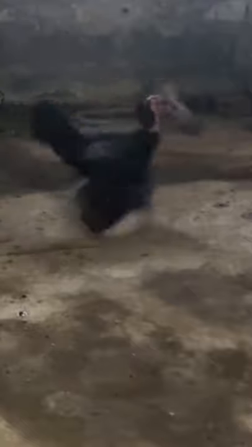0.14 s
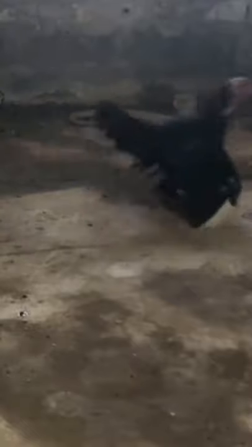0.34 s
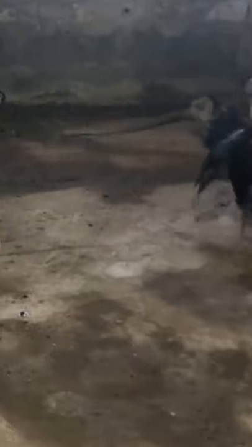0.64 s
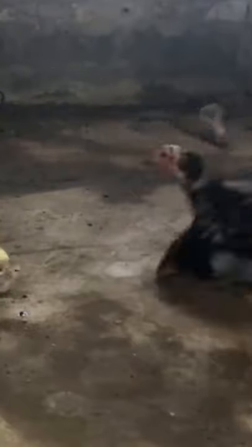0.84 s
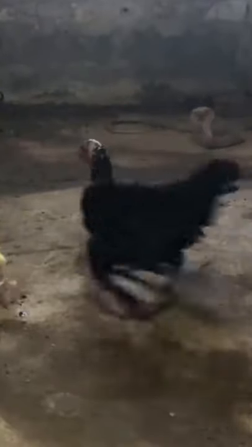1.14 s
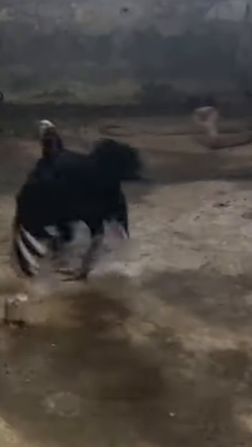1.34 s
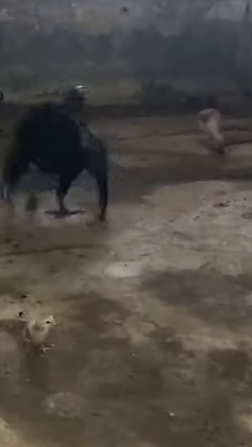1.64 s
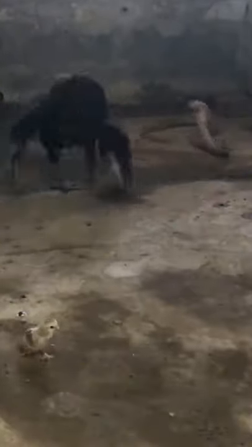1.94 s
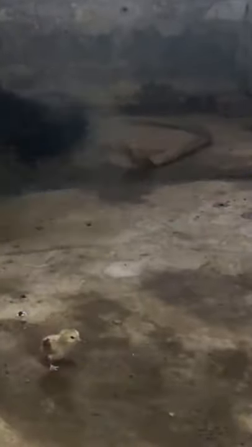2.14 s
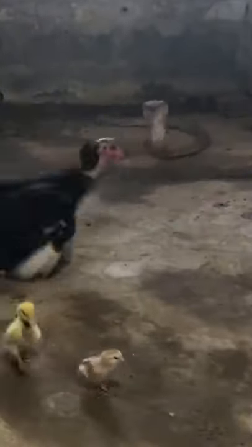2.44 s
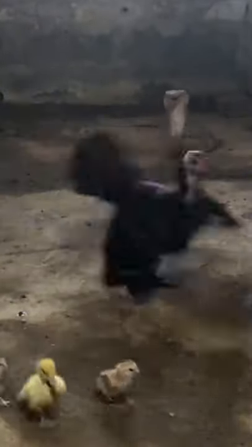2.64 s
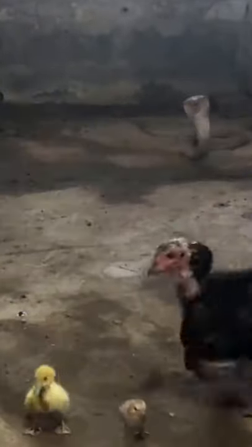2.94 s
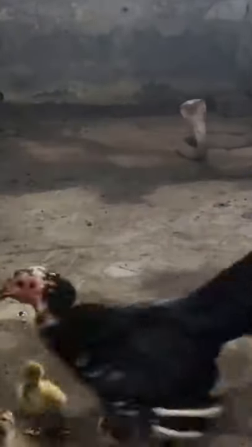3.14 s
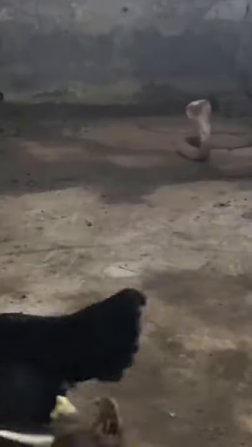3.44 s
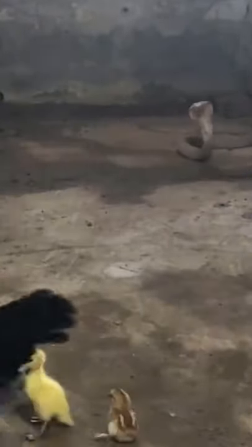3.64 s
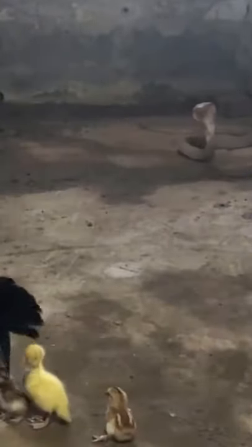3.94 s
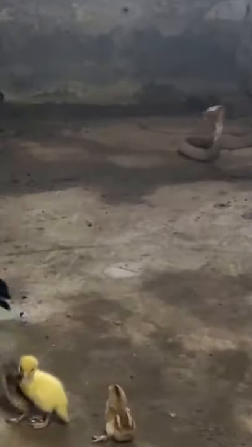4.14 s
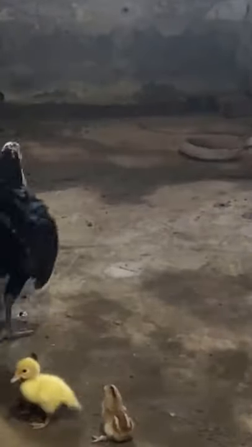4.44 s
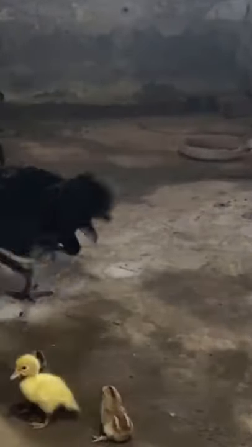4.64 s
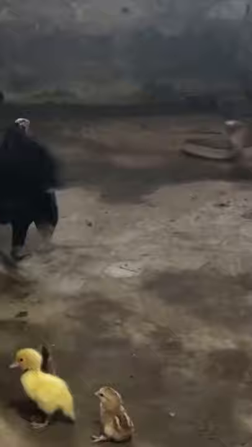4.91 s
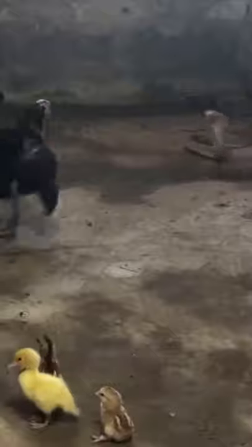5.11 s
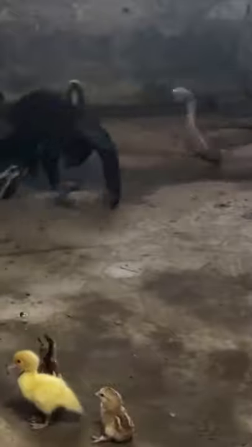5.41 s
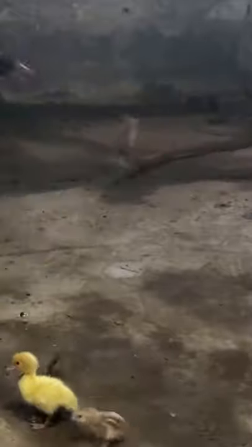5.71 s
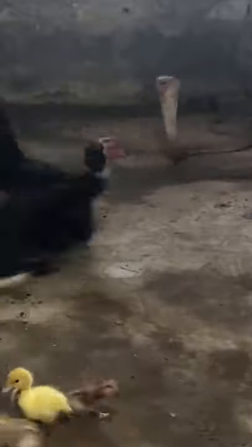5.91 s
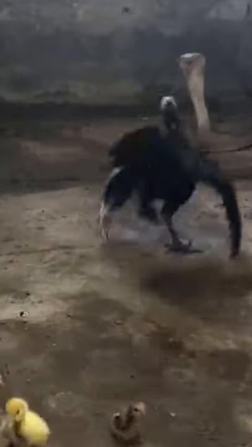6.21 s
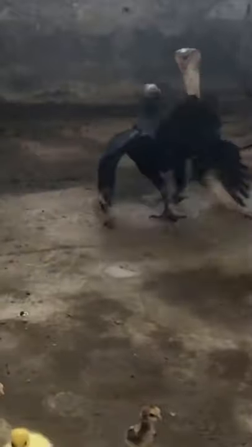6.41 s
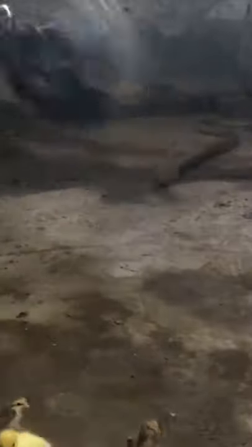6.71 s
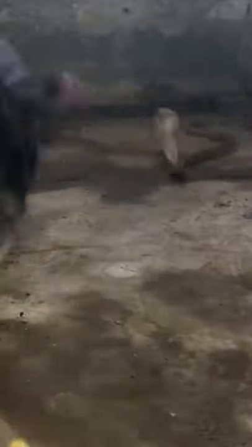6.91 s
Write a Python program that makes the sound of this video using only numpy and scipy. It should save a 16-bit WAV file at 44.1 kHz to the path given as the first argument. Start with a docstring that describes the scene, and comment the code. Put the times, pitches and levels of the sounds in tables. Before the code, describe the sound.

Close, rough hen cackling opens at once and grows dense through the middle, strained and nasal with a scratchy edge. Clear, piercing chick peeps continue underneath, with a few quavering shrieks around the fifth second. Soft to sharp air-like hisses come between calls. After one long squawk that cracks, the hen drops to sparse low clucks while the peeping goes on. Concrete walls give a short, dull ring over a faint low rumble.

```python
"""In a walled concrete yard a hen cackles in agitated bursts at a cobra and ends on three low, hoarse clucks.
Her voice is a buzzing syrinx filtered by the throat, with strained overtones and a noisy rasp above it.
Her chicks peep all the while: near-pure tones that arch, then drop into a fast downward slide; some shriek.
A breathy hiss, probably the snake, is filtered noise that swells and fades.
A steady low noise lies beneath, and decaying noise tails give the walls' short ring."""
import sys
import numpy as np
from scipy import signal
from scipy.fft import rfft, irfft
from scipy.io import wavfile
from scipy.ndimage import uniform_filter1d

SR = 44100
rng = np.random.default_rng(int(sys.argv[2]) if len(sys.argv) > 2 else 0)


def transcribe(signal):
    """Save signal, clipped to [-1, 1], as a 16-bit WAV file at the path in sys.argv[1]."""
    frames = np.atleast_2d(signal).T
    limited = np.clip(frames, -1, 1)
    pcm = np.round(limited * 32767).astype(np.int16)
    wavfile.write(sys.argv[1], SR, pcm)


N = 311339
TIME = np.arange(N) / SR   # s

# the hen's syllables, each one push of air; the levels are at full effort, ahead of each band's own gain:
# (start [s], swell [s], hold [s], pitch at full effort [Hz], roughness at full effort [0-1],
#  throat level [dB], strained overtone level [dB], rasp level [dB])
SYLLABLES = [ (-.02, .022, 0.017, 690, 0.53, -5, -19.5, -24),
             (0.144, .043, 0.025, 574, 0.38, -6.5, -14, -24.5),
             (0.371, .028, 0.028, 584.4, 0.35, -4, -20, -26.5),
             (0.772, .027, 0.021, 531.3, 0.31, -13, -37, -40),
             (1.407, .033, .026, 624.8, 0.38, -3, -22, -26.5),
             (1.609, .035, 0.019, 578.7, 0.13, -4, -26.5, -30),
             (1.804, .028, 0.023, 519.8, 0.17, -6, -34.5, -34.5),
             (1.872, .007, 0.0139, 424.7, .5, -17.5, -36, -43.5),
             (2.464, 0.0253, 0.027, 489, 0.36, -12.5, -41, -43),
             (2.545, 0.012, 0.033, 637, 0.4, -3, -21.5, -25.5),
             (2.733, 0.035, 0.036, 606.4, 0.2, -6.5, -26.5, -29),
             (2.901, .036, 0.014, 705, 0.27, -4, -26, -23.5),
             (3.091, .036, 0.017, 565, .35, -6, -25.5, -28.5),
             (3.423, .036, .02, 562.3, 0.29, -9.5, -35, -33),
             (3.711, .04, 0.019, 546.3, 0.26, -13, -36, -36.5),
             (3.793, .007, .034, 624.1, .6, -3, -27, -27),
             (3.956, .038, 0.029, 547.3, 0.54, -7.5, -34, -31),
             (4.528, .036, .012, 553.3, .35, -14, -29, -34),
             (4.599, .014, 0.02, 564, .6, -3.5, -16.5, -24.5),
             (4.86, .028, .024, 474.9, .2, -13, -32.5, -39.5), (5.224, .03, .03, 535, .25, -13.5, -41, -42),
             (5.958, .008, .008, 321.2, 0.62, -30, -57, -52),
             (5.998, 0.0063, .016, 343.6, 0.71, -17, -46, -46),
             (6.482, .008, .032, 428, .65, -18, -38, -48), (6.897, 0.015, 0.015, 330, .85, -14, -32, -44)]
RELEASE_S = 0.054   # effort dies away


def from_db(db):
    """Level to amplitude: 20 dB is a factor of ten."""
    return 10 ** (np.asarray(db) / 20)


def rms_one(x):
    """Normalization to unit root-mean-square amplitude."""
    return x / np.sqrt(np.mean(x ** 2) + 1e-20)


def coloured(x, spectrum):
    """Minimum-phase filtering: the folded cepstrum of a gain curve gives a causal response; rms 1."""
    hz, db = np.transpose(spectrum)
    size = 2 ** 14
    bins = np.maximum(np.fft.rfftfreq(size, 1 / SR), 1)
    gain = from_db(np.interp(np.log(bins), np.log(hz), db))
    gain = gain / np.sqrt(1 + (hz[0] / bins) ** 6)   # roll-off below the lowest listed frequency
    cepstrum = irfft(np.log(gain + 1e-5))[:size // 2]
    cepstrum[1:] *= 2
    response = irfft(np.exp(rfft(cepstrum, size)))
    return rms_one(signal.fftconvolve(x, response)[:N])


def flutter(rate_hz):
    """Random modulation: low-pass noise wavers up to about the given rate; spread 1."""
    lowpass = signal.butter(2, rate_hz, fs=SR, output="sos")
    return rms_one(signal.sosfilt(lowpass, rng.standard_normal(N)))


def evened(x, size):
    """Level control: division by the short-term rms holds the level near 1."""
    return x / np.sqrt(np.abs(uniform_filter1d(x * x, size)) + 1e-9)


def yard_noise(level_db=-56):
    """Stationary noise: random pressure filtered to a mostly low-frequency spectrum."""
    # spectrum of the background noise: (frequency [Hz], relative level per Hz [dB])
    spectrum = [(28, -8.5), (43, 12.5), (60, -6), (86, 7), (140, -7.5), (260, -1), (500, -38),
                (2200, -23.5), (2800, -11), (4000, -15), (6500, -32.5), (15500, -43)]
    return from_db(level_db) * coloured(rng.standard_normal(N), spectrum)


def effort_of(t, swell, hold):
    """Breath pressure: one push of air rises from 0 to 1, holds, and returns to 0."""
    return np.interp(t, [0, swell, swell + hold, swell + hold + RELEASE_S], [0, 1, 1, 0])


def syllables():
    """Vocal effort raises pitch, clearness and level, the treble most; the squawk has its own course."""
    # one long squawk rises, holds clear, then breaks up; levels are ahead of each band's own gain:
    # (time [s], pitch [Hz], roughness [0-1], throat level [dB], strained overtone level [dB], rasp level [dB])
    squawk = [(5.288, 556.3, 0.7, -7.5, -31, -36), (5.315, 636, 0, -12.5, -10, -20),
              (5.332, 635.4, .6, -8.5, -28, -30.5), (5.354, 633, .08, -11, -11, -22),
              (5.39, 598, .1, -12, -9.5, -22), (5.41, 581.6, .8, -6, -18, -24.5),
              (5.458, 496.6, .4, -9.5, -30, -38), (5.472, 470, .5, -41, -40, -45.5)]
    slack_pitch_start, slack_pitch_end = 0.27, 0.13   # share by which pitch lies low with no effort
    slack_rough = 0.3                                 # a slack syrinx is rougher
    swing_db = np.array([[18], [23], [28]])           # no effort to full: throat, strain, rasp
    edge_s = 0.003                                    # the voice switches on and off within this time

    pitch, rough, gains = np.full(N, 500.), np.zeros(N), np.zeros((3, N))
    for start, swell, hold, hz, roughness, *levels_db in SYLLABLES:
        # each syllable takes over from the last
        on = (TIME >= start) & (TIME < start + swell + hold + RELEASE_S)
        t = TIME[on] - start
        slack = 1 - effort_of(t, swell, hold)
        pitch_drop = np.where(t < swell, slack_pitch_start, slack_pitch_end)
        pitch[TIME >= start] = hz * (1 - slack_pitch_end)
        pitch[on] = hz * (1 - slack * pitch_drop)
        rough[on] = roughness + slack_rough * slack
        gains[:, on] = from_db(np.array(levels_db)[:, None] - swing_db * slack)

    on = (TIME >= squawk[0][0]) & (TIME < squawk[-1][0])
    times, *columns = np.transpose(squawk)
    pitch[on], rough[on], *levels_db = [np.interp(TIME[on], times, column) for column in columns]
    gains[:, on] = from_db(levels_db)
    return uniform_filter1d(pitch, size=600), np.clip(rough, 0, 1), uniform_filter1d(gains, int(edge_s * SR))


def bounces(x, strength=0.46):
    """Early reflections: floor and walls return delayed copies; as the hen darts about, the paths change."""
    out = x.copy()
    for start, swell, hold, *_ in SYLLABLES:
        on = (TIME > start) & (TIME < start + swell + hold + RELEASE_S)
        # three delays in seconds, drawn anew for every syllable
        for lag in rng.uniform([0.0004, 0.001, 0.004], [0.0015, 0.004, 0.016]):
            out[on] += strength * np.interp(TIME[on] - lag, TIME[on], x[on], left=0)
    return out


def syrinx(pitch, rough, jitter=0.075, shimmer=1.0, alternation=0.632):
    """Pulsed source: harmonics make a buzz; rough cycles jitter, vary and alternate in strength."""
    phase = 2 * np.pi * np.cumsum(pitch * (1 + jitter * rough * flutter(rate_hz=195.1))) / SR
    buzz = np.zeros(N)
    for k in range(1, 19):
        # overtones lag more and more, spreading each pulse over its cycle; each swells and fades on its own
        buzz += np.cos(k * phase - k * k / 5) * from_db(3.5 * flutter(rate_hz=35))
    buzz = rms_one(buzz)
    buzz *= 1 + rough * (shimmer * flutter(rate_hz=310) + alternation * np.cos(phase / 2))
    # turbulent air passes in time with the cycles
    air = rms_one(rng.standard_normal(N) * (1 + 0.5 * np.cos(phase)))
    return rms_one(bounces(buzz)), air


def open_throat(source, pitch):
    """Formant tuning: the hen stretches her throat as she calls higher, which lifts its resonances."""
    # spectrum of the open throat before stretching: (frequency [Hz], relative level per Hz [dB])
    throat = [(240, -20.5), (570, -11), (780, -0.5), (1030, 9.5), (1250, 6), (1520, -5.5), (1800, -24),
              (2600, -75)]
    # rise of the resonances with pitch: (pitch [Hz], frequency factor)
    stretch = [(460, .87), (570, 1.01), (700, 1.12)]
    pitches, factors = np.transpose(stretch)
    out = np.zeros(N)
    for weights, factor in zip(np.eye(len(factors)), factors):
        stretched = [(hz * factor, db) for hz, db in throat]
        # crossfade between the stretched throats as the pitch moves
        out += np.interp(pitch, pitches, weights) * coloured(source, stretched)
    return out


def hen(breath=0.502, rasp_noise=5, flicker=0.38, throat_db=-7.5, strain_db=-3.0, rasp_db=5):
    """Source-filter voice: syrinx buzz and turbulent air excite the throat, strained overtones and rasp."""
    # spectra: (frequency [Hz], relative level per Hz [dB])
    closed_spectrum = [(250, -11.5), (480, -7.0), (680, 2.5), (950, -6.0), (1300, -11.0),
                       (1700, -24), (2600, -51.5)]
    strain_spectrum = [(1300, -6.0), (1750, -0.5), (2050, -2.5), (2480, 4.5), (2900, -3.5),
                       (3600, -22.5), (6000, -31.5)]
    # spectrum of the rasp at the beak: (frequency [Hz], relative level per Hz [dB])
    beak_spectrum = [(1800, -11), (2700, -12), (3400, 6), (4200, -3), (5200, -5.5), (6500, -12), (8500, -8),
                     (11000, -15.5), (15500, -17)]

    pitch, rough, (throat_gain, strain_gain, rasp_gain) = syllables()
    buzz, air = syrinx(pitch, rough)
    source = buzz + breath * rough * air

    # the throat is wide open for the high cackle and nearly closed for a low cluck
    wide = open_throat(source, pitch)
    closed = coloured(source, closed_spectrum)
    opening = np.clip((pitch - 360) / 170, 0, 1)
    throat = evened(opening * wide + (1 - opening) * closed, size=400)
    strain = evened(coloured(source, strain_spectrum), size=400)

    # the rasp comes in uneven spurts
    rasp = evened(coloured(buzz + rasp_noise * rough ** 0.92 * air, beak_spectrum), size=400)
    rasp *= np.exp(flicker * rough * flutter(rate_hz=54))

    return (from_db(throat_db) * throat_gain * throat
            + from_db(strain_db) * strain_gain * strain
            + from_db(rasp_db) * rasp_gain * rasp)


def walls(x, t60, wet_db, dull_hz):
    """Reverberation: convolution with decaying noise gives a diffuse, dull tail between the walls."""
    t = TIME[:SR]
    build_up = np.clip(t / 0.0083, 0, 1)
    tail = rng.standard_normal(SR) * from_db(-60 * t / t60) * build_up
    lowpass = signal.butter(1, dull_hz, fs=SR, output="sos")
    tail = signal.sosfilt(lowpass, tail / np.linalg.norm(tail))
    return from_db(wet_db) * signal.fftconvolve(x, tail)[:N]


def whistle(hz, second_db=-28, third_db=-36):
    """Near-pure tone: integrated frequency gives the phase; two weak harmonics are added."""
    phase = 2 * np.pi * np.cumsum(hz) / SR
    return np.sin(phase) + from_db(second_db) * np.sin(2 * phase) + from_db(third_db) * np.sin(3 * phase)


def peeping(rows, arch_s=0.055, arch_growth=1.3, boost_db=5.5, waver=0.011, bounce=0.56):
    """Frequency glide: a soft arch, longer the higher it goes, then a louder slide, with reflections."""
    # how far the arch lies under its slide as the brood moves about: (time [s], level difference [dB])
    arch_under = [(0, 11), (2.2, 8.5), (3.4, 11), (5.2, 13), (5.8, 2.5), (7, 6.5)]
    # pitch along the arch; progress runs from -1 to 0: (progress, share of the top pitch)
    arch_course = [(-1.1, .92), (-.88, 0.96), (-.68, 1.), (-.42, 0.96), (-.15, .88)]
    # pitch down the slide; progress runs from 0 to 1: (progress, frequency [Hz])
    slide_course = [(0, 3730), (.4, 3200), (.97, 2610)]
    arch_at, arch_share = np.transpose(arch_course)
    slide_at, slide_hz = np.transpose(slide_course)
    pitch_at = np.concatenate([arch_at, slide_at])
    level_at = [-1.4346, -1.0543, -0.14, -0.03, 0.68, 1.0, 1.5]

    out, wobble = np.zeros(N), 1 + waver * flutter(rate_hz=630)
    for start, top_hz, slide, slide_db in rows:
        arch = (arch_s + 0.5 * slide) * (top_hz / 5150) ** arch_growth
        arch_db = slide_db - np.interp(start, *np.transpose(arch_under))
        on = (TIME > start - 2 * arch) & (TIME < start + 2 * slide + 0.03)
        t = TIME[on] - start
        progress = np.where(t < 0, t / arch, t / slide)
        hz = np.interp(progress, pitch_at, np.concatenate([arch_share * top_hz, slide_hz]))
        levels_db = [-100, arch_db - 7, arch_db, slide_db, slide_db + 0.5, slide_db - 13.5, -100]
        db = np.interp(progress, level_at, levels_db)
        peep = from_db(db + boost_db) * whistle(uniform_filter1d(hz, size=250) * wobble[on])
        out[on] += peep
        # the chicks move, so each peep has floor and wall bounces of its own
        for lag in rng.exponential(0.0086, size=5):
            out[on] += bounce * np.interp(t - lag, t, peep) / (1 + lag / 0.033)
    return out


def near_chicks():
    """Tonal calls from the nearer brood, each on its own frequency glide."""
    # peeps, levels ahead of the common boost:
    # (start of the slide [s], top of the arch [Hz], slide length [s], slide level [dB])
    peeps = [(.118, 5100, 0.033, -39.5), (.376, 4660, 0.023, -35.5), (.636, 5270, 0.037, -41),
             (.691, 5180, 0.042, -34), (.761, 4760, 0.089, -42), (1.005, 5087, 0.032, -37),
             (1.101, 5130, 0.011, -36.5), (1.258, 4960, 0.031, -34.5), (1.312, 4670, 0.057, -34),
             (1.482, 5340, 0.018, -41), (1.583, 5370, 0.036, -39.5), (1.728, 5250, 0.022, -31.5),
             (1.85, 5210, .035, -37), (1.962, 4690, .028, -42), (1.99, 5540, 0.028, -30.5),
             (2.04, 5100, 0.065, -32.5), (2.155, 5020, .022, -40.5), (2.261, 5640, 0.026, -29.5),
             (2.35, 5040, .034, -40), (2.403, 5150, 0.039, -33.5), (2.572, 5490, .035, -32.5),
             (2.874, 5480, 0.031, -32.5), (3.06, 5120, 0.035, -45), (3.227, 4922, 0.045, -42),
             (3.321, 4850, 0.029, -39), (3.391, 5490, 0.036, -36), (3.555, 5014, 0.038, -48),
             (3.661, 4430, 0.025, -37), (3.705, 5016, .035, -34.5), (3.725, 5224, 0.036, -35.5),
             (3.908, 5000, 0.037, -42.5), (4.236, 5069, .038, -35), (4.352, 4800, 0.024, -41),
             (4.415, 5726, 0.034, -37.5), (4.749, 4813, .038, -42), (5.009, 4700, 0.025, -34),
             (5.125, 4970, .035, -38.5), (5.244, 5194, .054, -34), (5.539, 4690, 0.026, -37),
             (5.619, 5230, 0.043, -32), (5.69, 4820, .03, -41), (5.85, 5326, 0.038, -36.5),
             (5.91, 5007, .029, -39.5), (5.989, 4950, 0.021, -34), (6.101, 5250, .037, -35.5),
             (6.226, 4950, 0.029, -35), (6.341, 5050, .026, -37), (6.572, 5286, .029, -32.5),
             (6.645, 4460, 0.041, -44), (6.774, 5000, .038, -37), (6.849, 5000, 0.041, -34.5),
             (7.015, 4850, .04, -42)]
    return peeping(peeps)


def far_chicks(db=-48, count=38):
    """Distance attenuation: the rest of the brood peeps faintly from further off, one after another."""
    times = (np.arange(count) + rng.random(count)) / count * TIME[-1]
    return peeping([(s, rng.uniform(4700, 5600), rng.uniform(0.025, 0.05), db) for s in times])


def hiss(boost_db=2, unsteady_db=1.4):
    """Turbulence: air forced through a narrow opening swells, holds and fades, slightly unsteady."""
    # hisses, levels ahead of the common boost:
    # (time of full strength [s], hold [s], level [dB], swell [dB/s], fade [dB/s])
    hisses = [(.55, .4, -56, 60, 30), (1.35, 0.086, -41.5, 25.5, 68), (2.067, .2, -55.5, 32, 24),
              (2.996, 0.094, -41.5, 102.5, 109), (3.548, 0.21, -57.5, 58, 50.5),
              (4.477, 0.013, -39, 1100, 259.5), (4.949, .42, -40, 46, 113), (6.17, 0.065, -54.5, 90, 14.5)]
    # spectrum of the hiss: (frequency [Hz], relative level per Hz [dB])
    spectrum = [(150, -4), (350, 9), (650, -6), (1600, -5.5), (3200, -5), (5000, 2), (6500, -10), (8200, 4),
                (11300, -3.5), (14500, -1)]
    gain = np.zeros(N)
    for full, hold, db, swell, fade in hisses:
        before = np.maximum(full - TIME, 0)
        after = np.maximum(TIME - full - hold, 0)
        gain += from_db(db - swell * before - fade * after)
    unsteady = from_db(boost_db + unsteady_db * flutter(rate_hz=60))
    return gain * unsteady * coloured(rng.standard_normal(N), spectrum)


def shrieks(quaver=0.036):
    """Frequency modulation: a frightened chick's high, quavering chirp rises and falls."""
    # chirps: (time of the peak [s], top frequency before the quaver [Hz], peak level [dB])
    chirps = [(2.46, 5600, -42), (4.536, 5807, -31.5), (4.875, 5490, -36.5), (5.073, 5740, -31)]
    out, wobble = np.zeros(N), 1 + quaver * flutter(rate_hz=340)
    for peak, top_hz, db in chirps:
        t = (TIME - peak) / 0.04   # in units of 40 ms
        on = np.abs(t) < 2
        hz = top_hz * (1 - 0.12 * t[on] ** 2) * wobble[on]
        out[on] += from_db(db - 11 * t[on] ** 2) * whistle(hz)
    return out


def scene():
    """Superposition: hen and chicks with their wall tails, the hiss and the low noise add up."""
    cackle = hen()
    peeps = near_chicks() + far_chicks() + shrieks()
    cackle = cackle + walls(cackle, t60=0.38, wet_db=-7.0, dull_hz=2600)
    peeps = peeps + walls(peeps, t60=0.33, wet_db=-8, dull_hz=5000)
    return (cackle + peeps + hiss() + yard_noise())[None]


def record(dry, cutoff_hz=15850):
    """Soft saturation rounds the loudest peaks; a steep low-pass cuts the top."""
    rounded = dry / (1 + (dry / 0.9) ** 6) ** (1 / 6)
    lowpass = signal.ellip(10, 0.1, 90, cutoff_hz, fs=SR, output="sos")
    return signal.sosfilt(lowpass, rounded)


dry = scene()
out = record(dry)
transcribe(out)
```